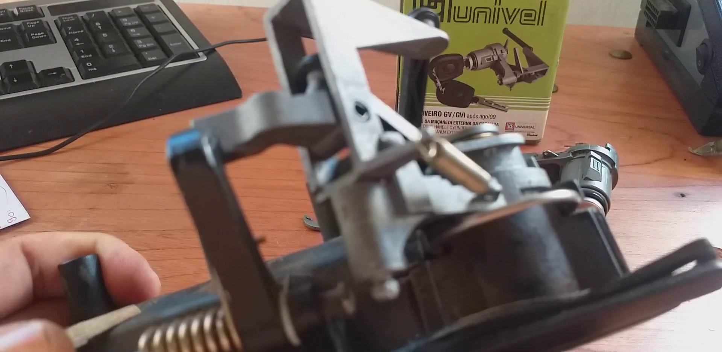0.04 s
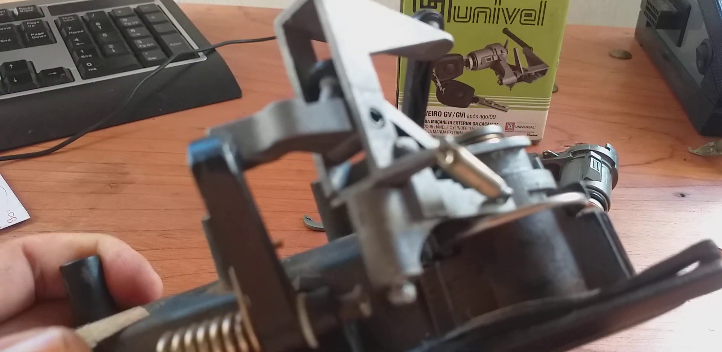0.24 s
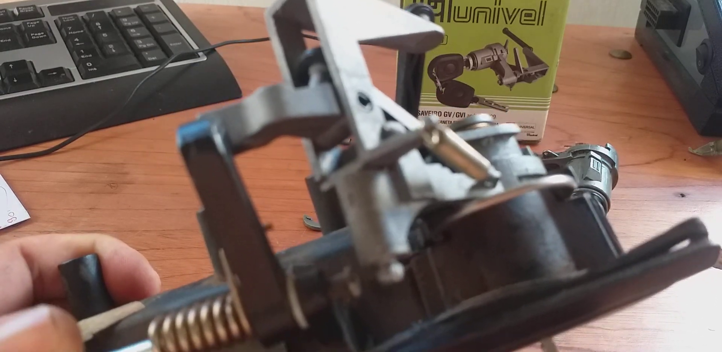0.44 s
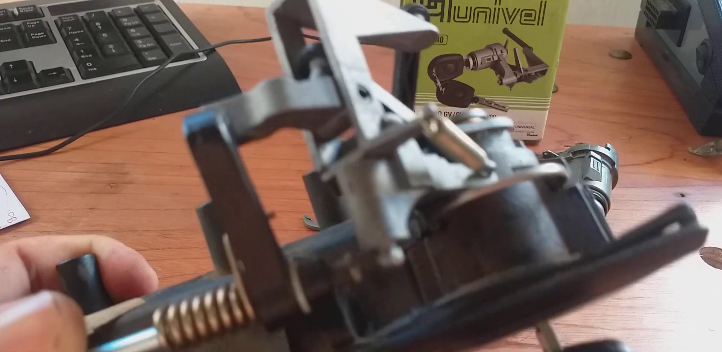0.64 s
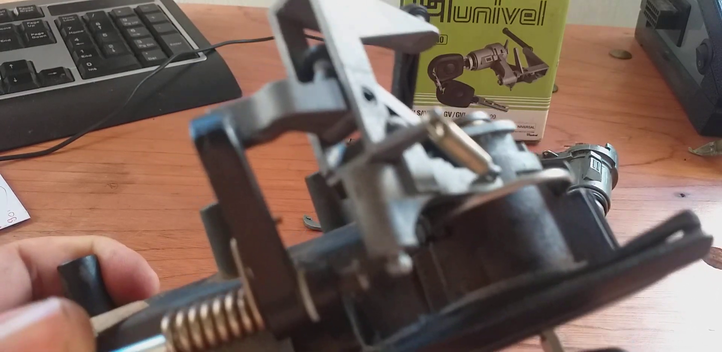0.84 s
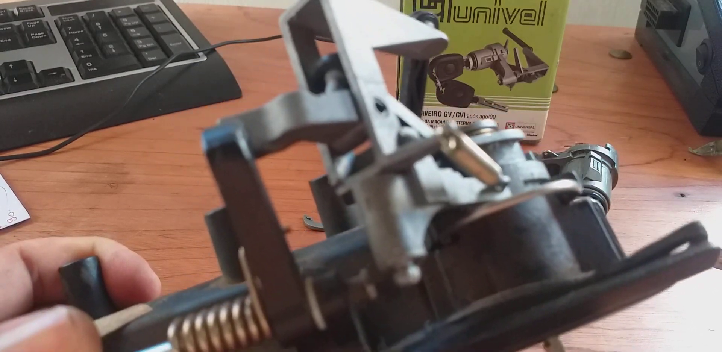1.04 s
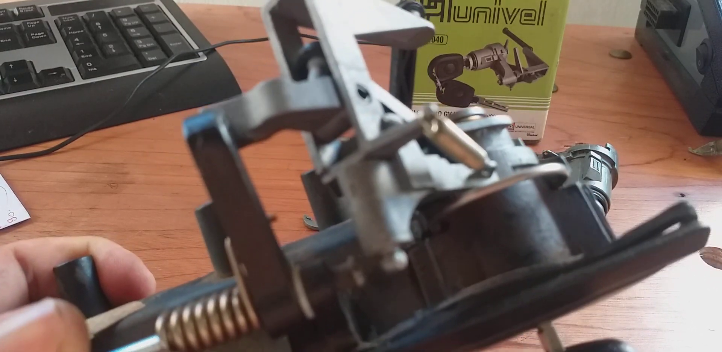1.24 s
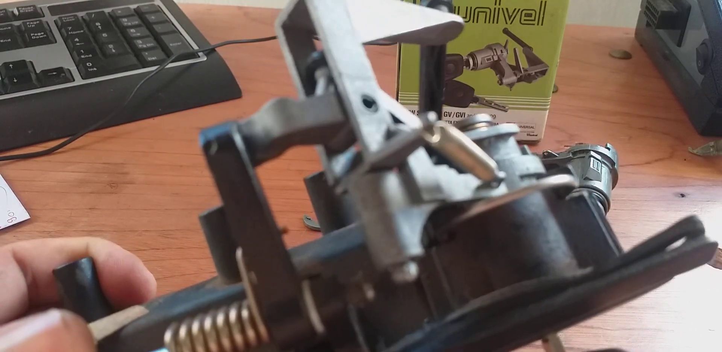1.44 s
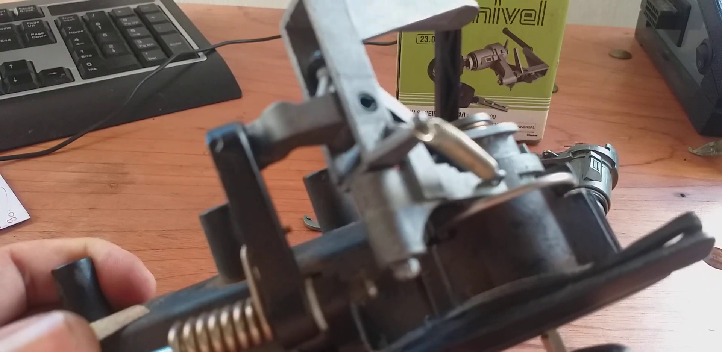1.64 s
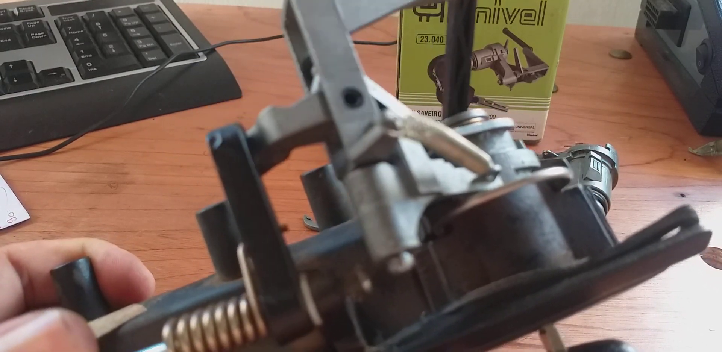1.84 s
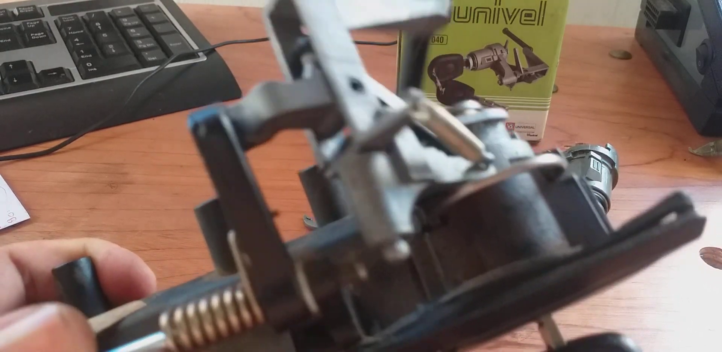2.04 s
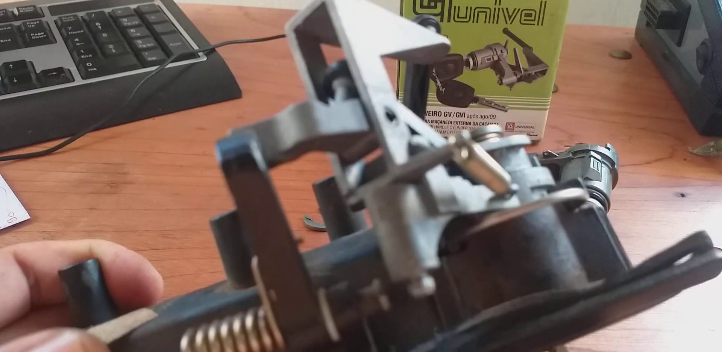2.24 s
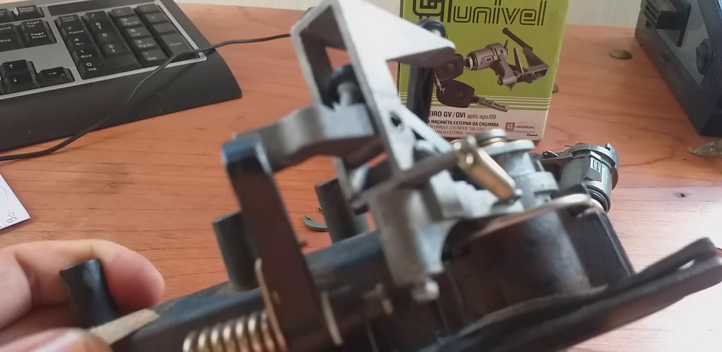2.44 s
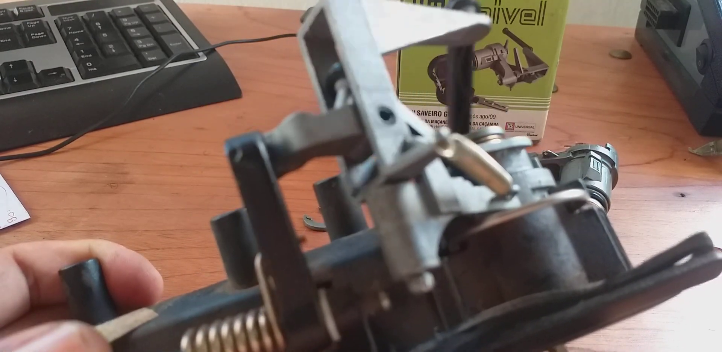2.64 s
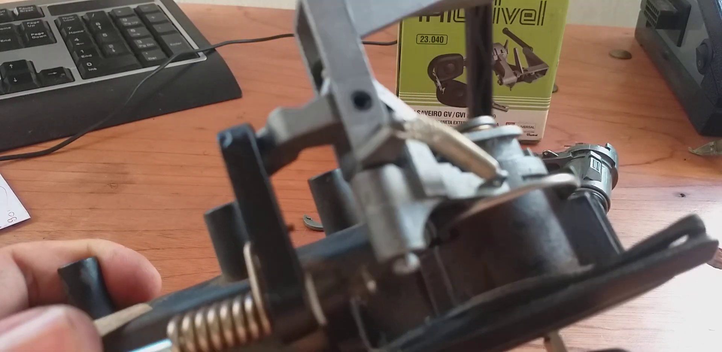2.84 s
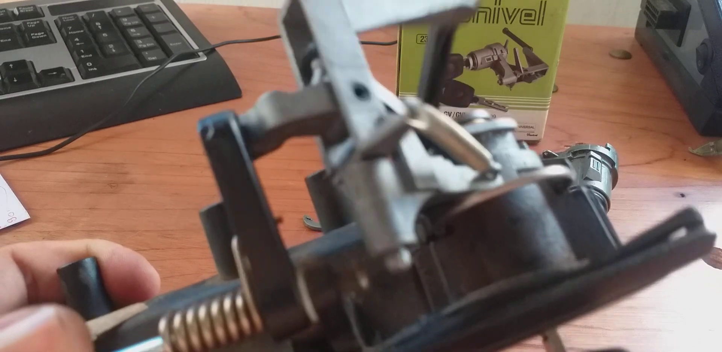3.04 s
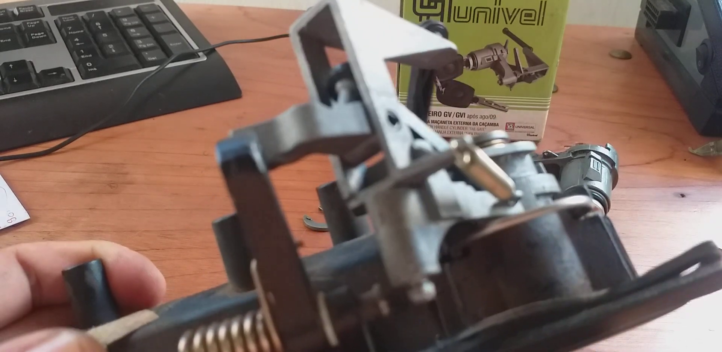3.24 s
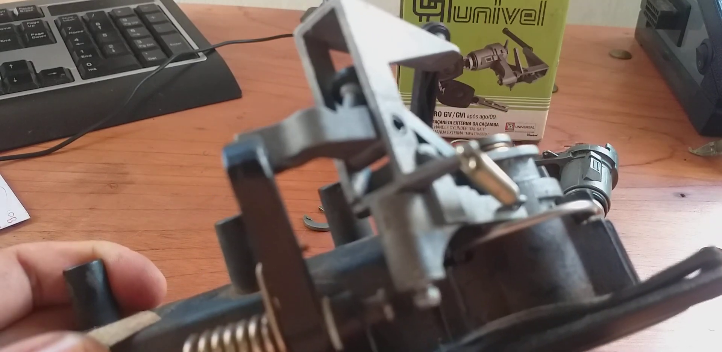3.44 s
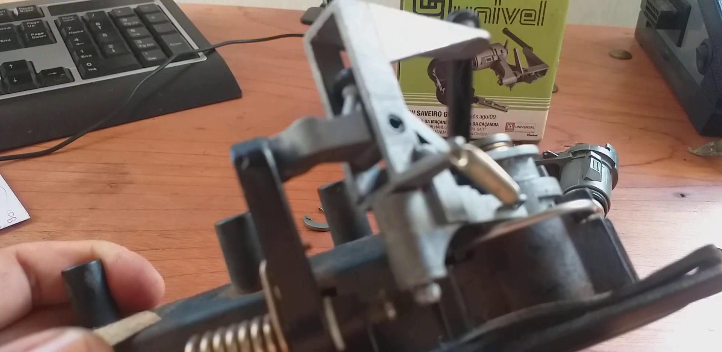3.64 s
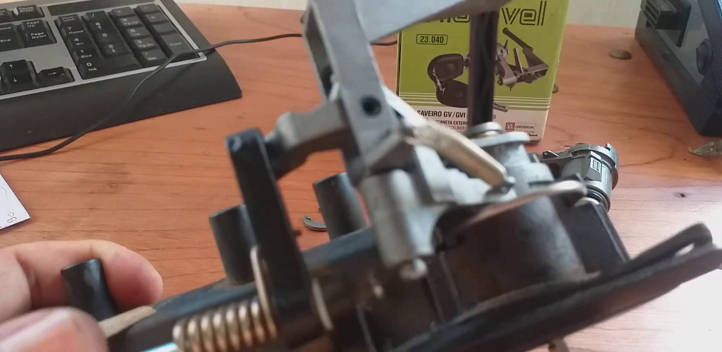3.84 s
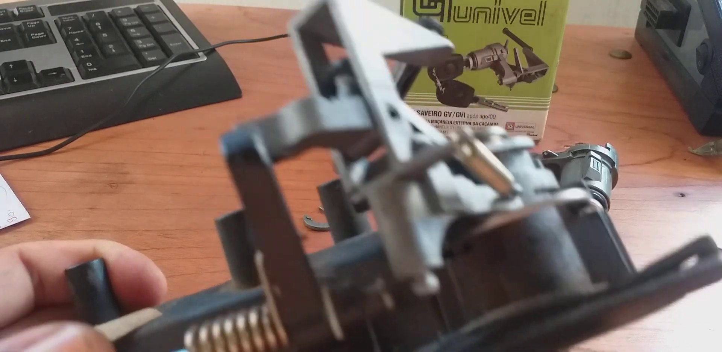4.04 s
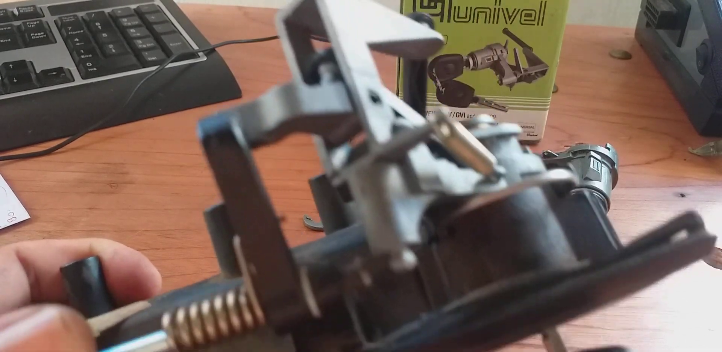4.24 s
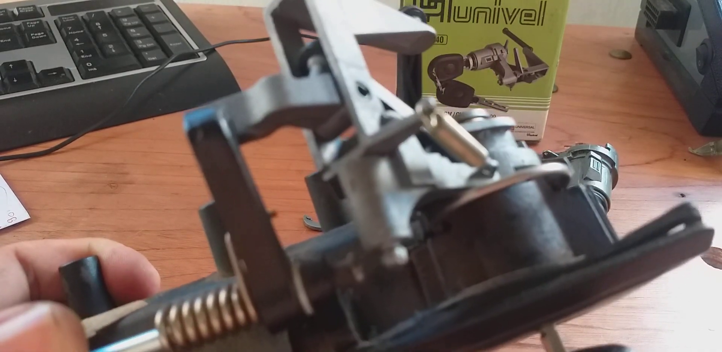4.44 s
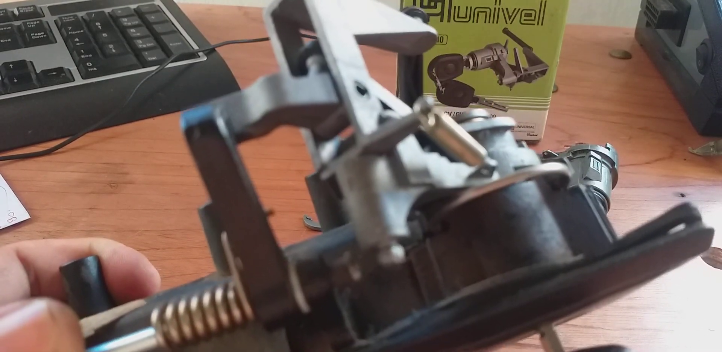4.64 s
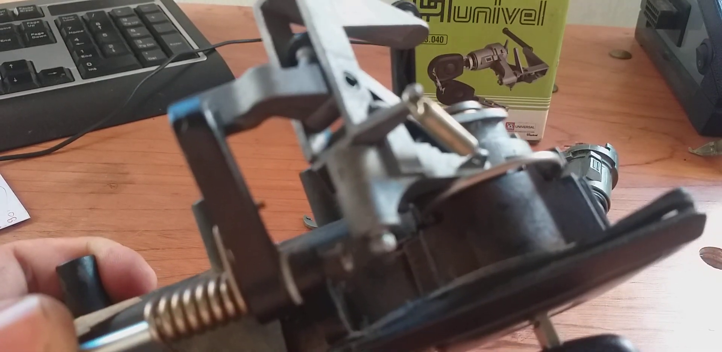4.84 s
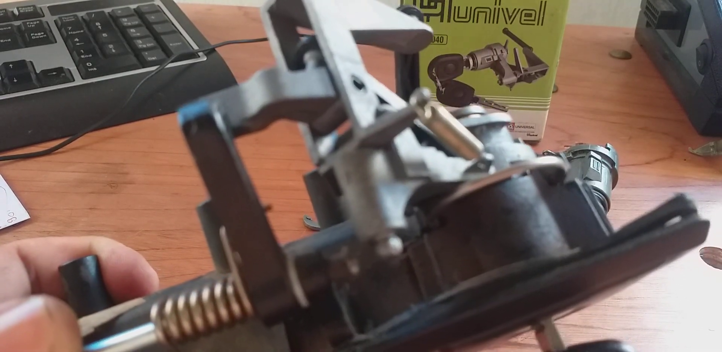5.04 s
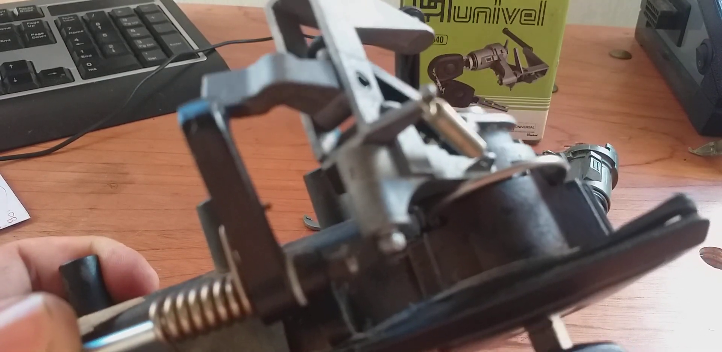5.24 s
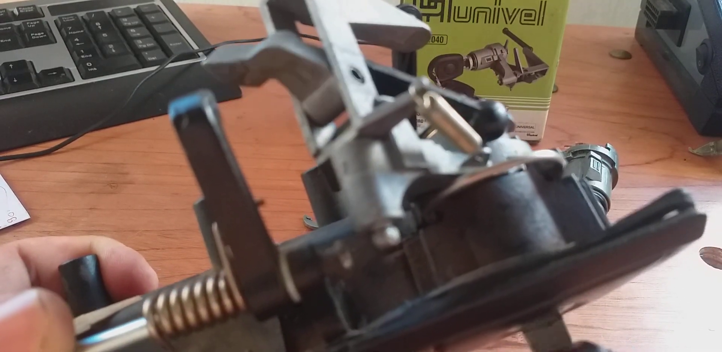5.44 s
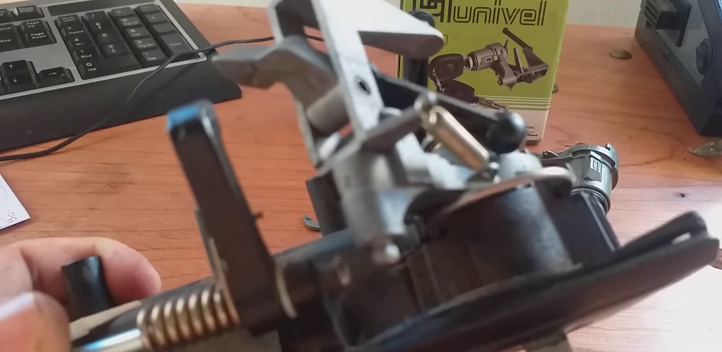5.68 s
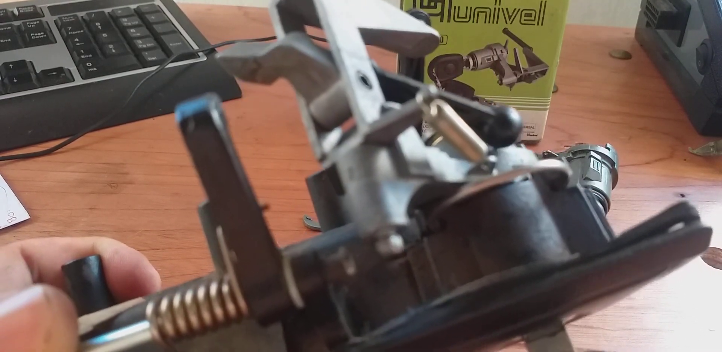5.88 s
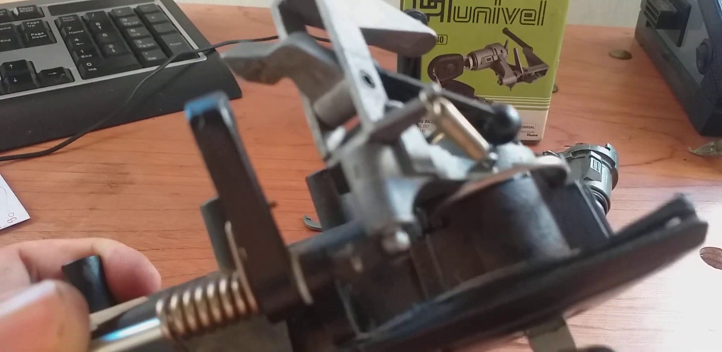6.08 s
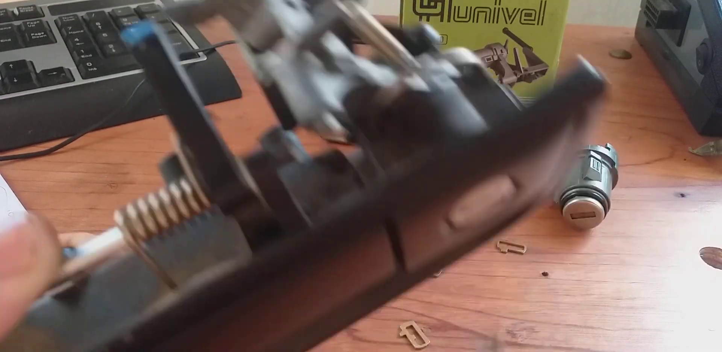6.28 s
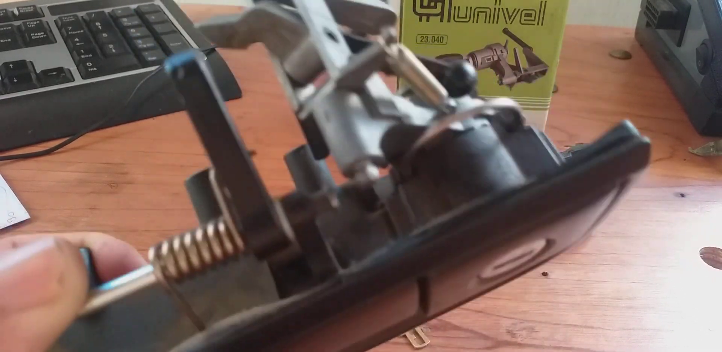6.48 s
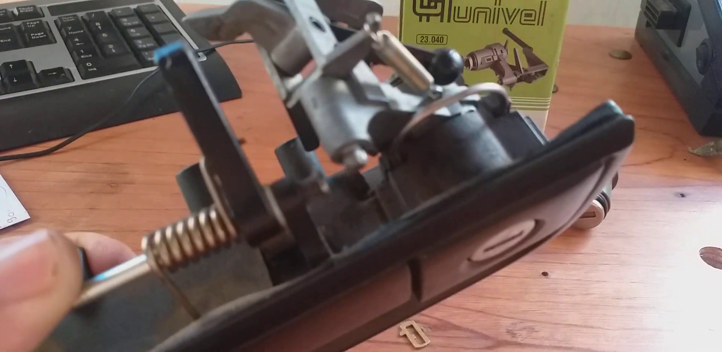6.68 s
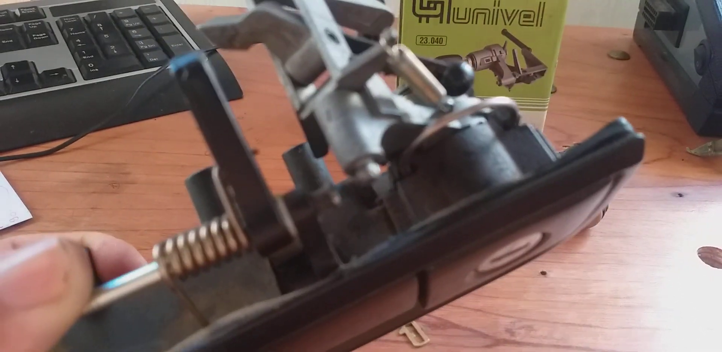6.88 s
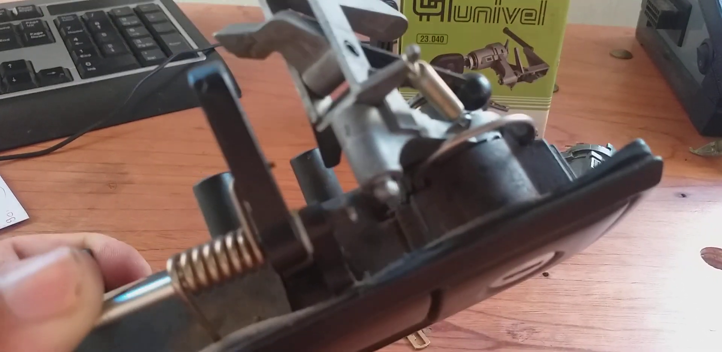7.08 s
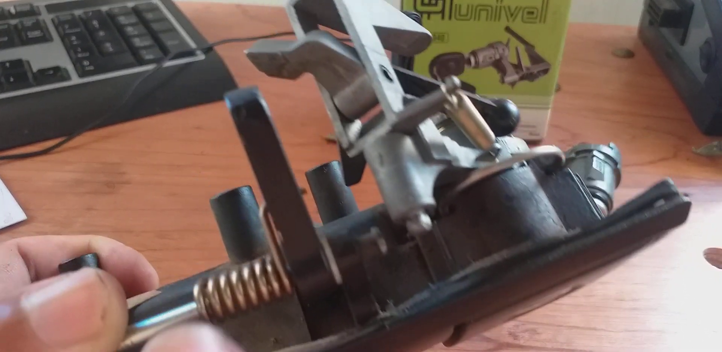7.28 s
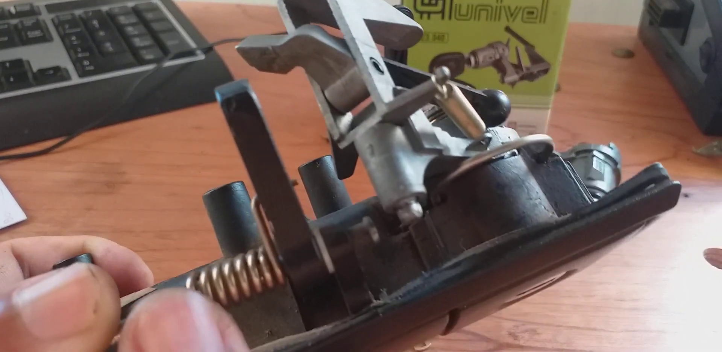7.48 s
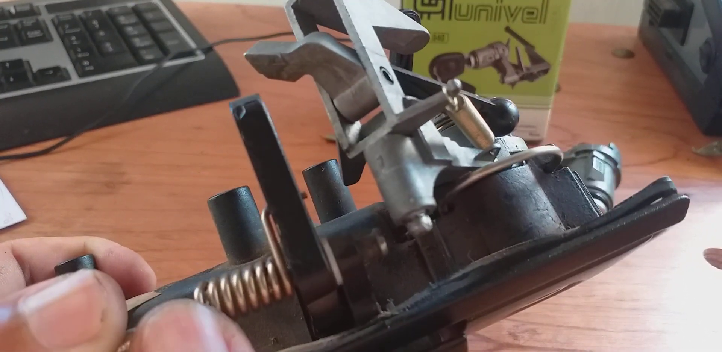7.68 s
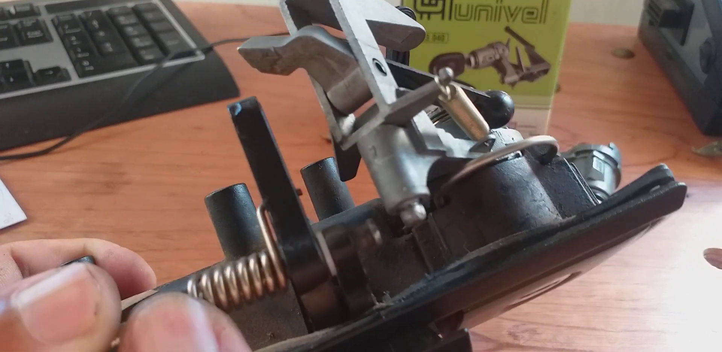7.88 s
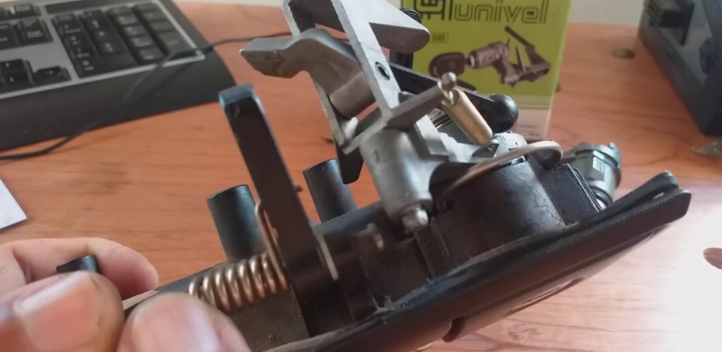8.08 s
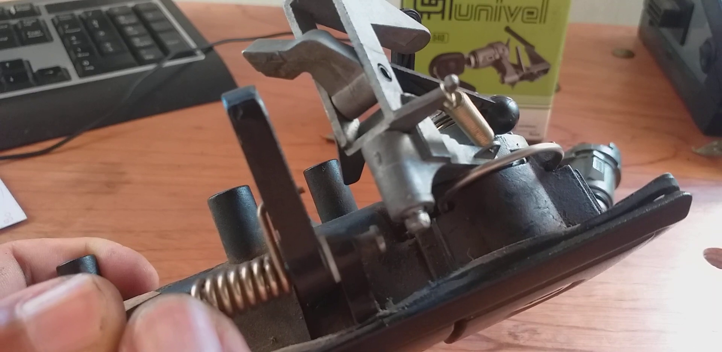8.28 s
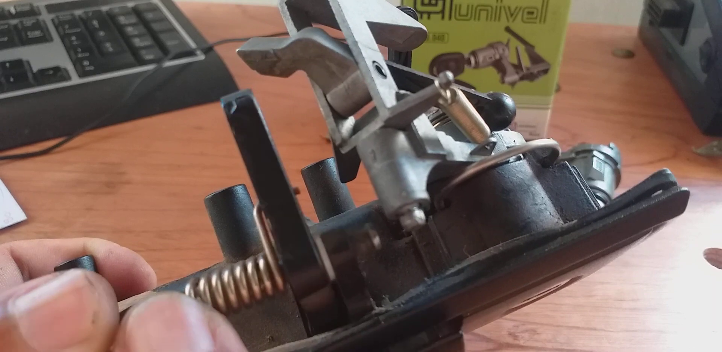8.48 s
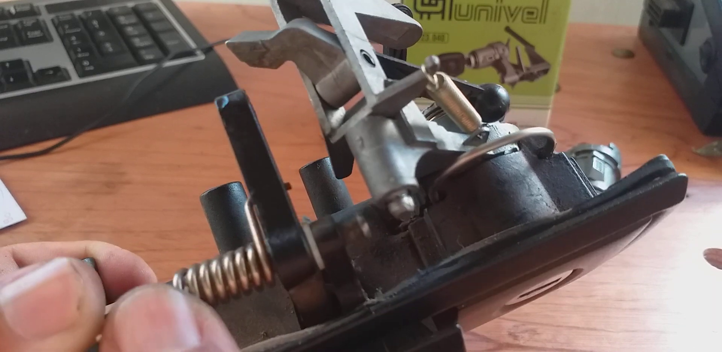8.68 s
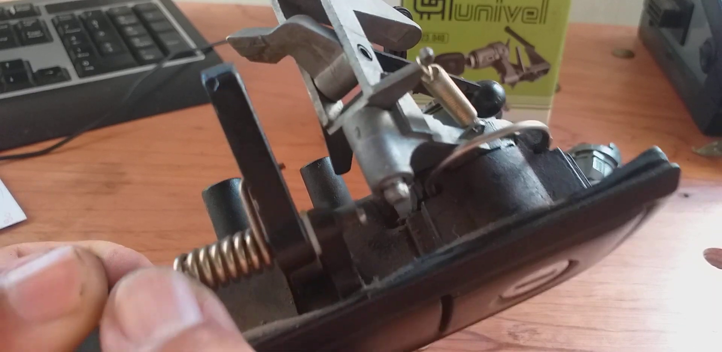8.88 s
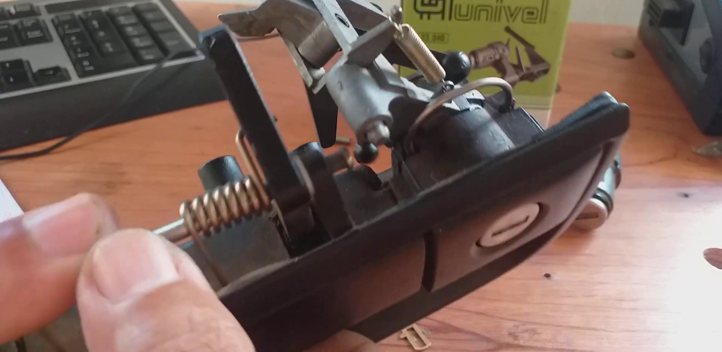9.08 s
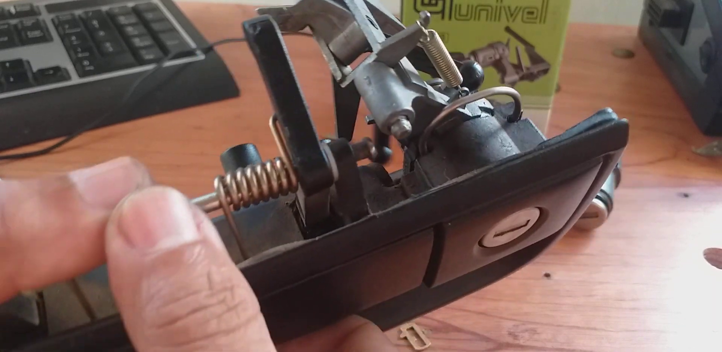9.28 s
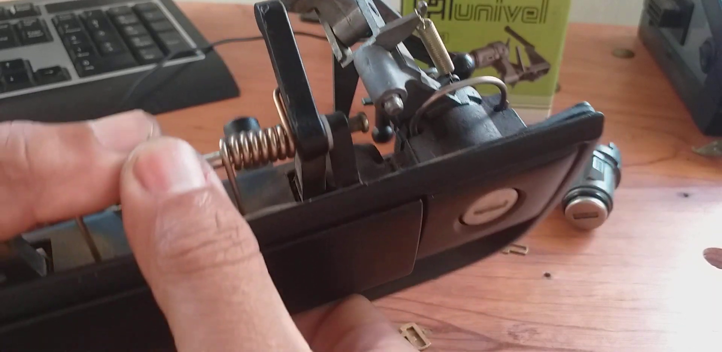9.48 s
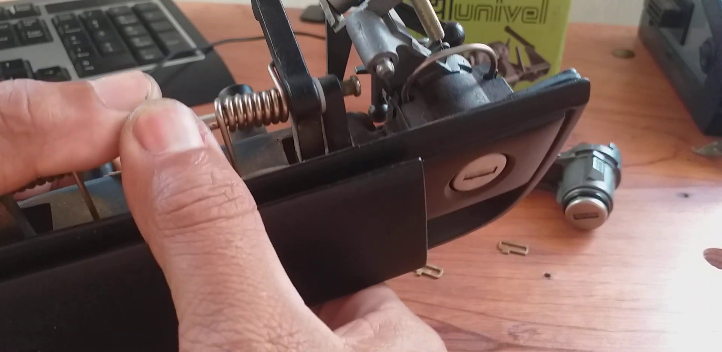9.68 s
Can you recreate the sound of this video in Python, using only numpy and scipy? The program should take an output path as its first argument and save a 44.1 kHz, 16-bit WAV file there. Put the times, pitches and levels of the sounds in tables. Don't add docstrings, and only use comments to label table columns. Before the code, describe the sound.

Close to the microphone, a small lock handle is worked by hand over a wooden desk. Irregular thin clicks and light rattles come in pairs and clusters, with soft low bumps. Past six seconds a shrill metal squeal and very loud snaps burst out, then only faint ticks remain. A low engine idles outside and fades over distant street rumble and soft hiss, in a short hard-walled room.

```python
import sys
import numpy as np
from scipy import signal
from scipy.fft import rfft, irfft, next_fast_len
from scipy.io import wavfile
from scipy.ndimage import map_coordinates

SR = 44100
rng = np.random.default_rng(int(sys.argv[2]) if len(sys.argv) > 2 else 0)


def to_linear_factor(level_db):
    exponent = np.asarray(level_db, float) / 20
    return 10 ** exponent


def file_out(sig):
    cols = np.atleast_2d(sig).T
    lim = np.clip(cols, -1, 1)
    pcm = np.round(lim * 32767).astype(np.int16)
    wavfile.write(sys.argv[1], SR, pcm)


N = 428652

# t/s, level/dB
RUMBLE_LEVEL = [(0, -72), (3, -72), (6.5, -71), (7.3, -72), (8.6, -70.5), (9.3, -72), (9.72, -75.5)]
# f/Hz, level/dB
STREET_COLOUR = [(25, -22), (45, -11.5), (70, -3), (130, -6), (200, -5), (330, -14), (450, -20), (600, -21),
                 (1200, -38.5), (3000, -61)]
# f/Hz, level/dB
HISS_COLOUR = [(410, -27), (700, -2.5), (767, -1.5), (1040, -1.5), (1140, -2), (2080, -4.5), (4050, -4),
               (8760, -10), (15000, -5), (16000, -6)]
RUMBLE_LUMPS_DB, RUMBLE_SWING_DB = 2.4, 1.5
HISS_DB, DUCK_DB, DUCK_S, DUCK_WIDTH_S = -75.5, 3.5, 7.7, .4

# t/s, firing rate f/Hz, level/dB, brightness of the upper orders level/dB
ENGINE_COURSE = [(0, 28.47, -63, -3), (.3, 28.43, -62.5, 7.5), (1, 28.5, -61, 1), (1.5, 28.68, -64, 2.5),
                 (2.2, 28.65, -62.5, -1), (2.7, 28.05, -64, 0.5), (3.4, 26.75, -66, -5),
                 (4.2, 27.06, -71.5, 2), (5, 26.48, -68.5, -7.5), (6, 27.2, -67.5, -1),
                 (6.6, 26.58, -71.5, -0.5), (7.05, 26.96, -79, 3.5), (7.28, 27.18, -84.5, -5),
                 (9.2, 27.19, -77.5, -6), (9.72, 27.2, -85, -6)]
# order of the firing rate, level/dB
EXHAUST_ORDERS = [(3, -10.5), (4, -6.5), (5, 2.5), (6, 2.5), (7, -11.5), (8, -17), (9, -11), (10, -9),
                  (11, -11), (12, -12), (13, -15), (14, -14)]
# f/Hz, level/dB
ROAR_COLOUR = [(40, -40), (80, -8.5), (150, -2.5), (330, -5), (430, -8), (600, -25), (1500, -50)]
ORDER_WAVER = 1.2
ORDER_SWING_DB, ROAR_SWING_DB = 2.4, 2.2

# f/Hz, t60/s
WALL_T60 = [(80, .3), (200, 0.85), (800, 0.29), (2100, 0.33), (5500, 0.31), (14600, 0.31)]

# t/s, peak level/dB, f/Hz
DESK_BUMPS = [(0.58, -40.5, 169), (0.889, -47.5, 113), (1.33, -42, 164), (2.59, -38.5, 178),
              (3.11, -45.5, 188.6), (3.602, -39.5, 163), (3.83, -47, 186), (4.032, -40.5, 125),
              (5.118, -45.5, 127), (5.218, -47, 152), (5.519, -47.5, 124), (5.855, -46, 135),
              (6.045, -46.5, 130), (6.434, -39.5, 118.6), (6.8165, -34, 165), (6.619, -47, 210),
              (6.664, -45, 190), (6.842, -38, 155), (7.857, -54.5, 127.2), (8.088, -36.5, 175),
              (8.095, -49, 331), (8.088, -40, 80), (8.94, -54, 105.1), (9.277, -51, 125), (9.285, -57, 58),
              (8.83, -58, 160)]
DESK_T60_S = 0.1

# t/s, length/s, f/Hz, width/Hz, level/dB
SLIDE_STROKES = [(0.486, 0.022, 5140, 400, -69), (0.523, 0.14, 5200, 6000, -67),
                 (0.736, .29, 4660, 1310, -79), (0.78, .21, 7050, 1600, -80), (1.387, .16, 730, 500, -72),
                 (1.755, 0.031, 2660, 320, -69.5), (1.758, 0.038, 1290, 260, -69),
                 (4.641, .08, 4900, 1220, -78), (4.72, 0.16, 2800, 150, -84), (4.72, 0.18, 3270, 150, -83),
                 (4.76, .17, 3770, 120, -85), (4.65, .17, 6300, 3000, -78), (4.7, .25, 3300, 2000, -85),
                 (4.44, .2, 700, 600, -80), (6.668, .075, 3130, 1900, -43), (6.303, .014, 12100, 350, -30),
                 (6.285, .05, 13550, 500, -38), (6.29, .12, 5800, 2500, -54), (8.09, .075, 3800, 2500, -80),
                 (6.582, .075, 3300, 3000, -53), (.655, .1, 2200, 1500, -66), (.56, .3, 900, 900, -74),
                 (6.745, .06, 3000, 2600, -57), (8.095, .065, 1110, 160, -74),
                 (5.361, 0.16, 5030, 4050, -73.5), (5.8, 0.12, 4700, 3005, -65),
                 (6.146, 0.085, 11800, 301, -51.5), (6.179, .099, 12620, 1540, -44.5),
                 (6.208, 0.028, 5470, 4020, -43.5), (6.226, .012, 11840, 900, -32),
                 (6.254, 0.047, 13570, 602.6, -37), (6.263, .011, 12570, 1518, -28),
                 (7.087, .011, 11280, 1200, -49), (7.068, .03, 11230, 900, -64),
                 (7.2, 0.19, 4280, 1800, -80.5), (7.279, .12, 1754, 700, -80), (9.06, .2, 557, 60, -85),
                 (8.129, 0.013, 2090, 600, -76)]
# t/s, length/s, level/dB
CAM_RIDES = [
    (2.068, .035, -78),
    (2.107, .086, -81),
    (2.456, .23, -80),
    (3.077, .045, -74),
    (4.012, .03, -72),
]
RIDE_HZ, RIDE_WIDTH_HZ = 7540, 280

# t/s, rise/s, fall/s,
# f/Hz, peak level/dB
SQUEALS_AND_PINGS = [(6.2372, .0046, .001, 13050, -.2), (6.2419, .002, .0017, 13400, -6),
                     (6.2453, .0033, .0062, 13630, -3.5), (6.2712, .0022, .0062, 12170, -.2),
                     (6.2752, .002, .0012, 13550, -10), (6.2785, .0035, .001, 12250, -6.5),
                     (.2171, .0005, .0025, 15700, -29), (6.2808, .0012, .002, 5200, -16.5),
                     (6.2808, .0012, .002, 8000, -17), (6.2805, .0015, .003, 2300, -27),
                     (6.2535, .002, .003, 13500, -17), (8.085, .003, .009, 1100, -47),
                     (8.085, .003, .008, 1780, -60), (8.086, .003, .008, 2750, -65),
                     (3.1148, .002, .006, 2690, -40), (2.103, .004, .008, 2690, -48),
                     (3.604, .003, .012, 1060, -50), (6.2338, .003, .002, 12400, -20),
                     (6.1487, .001, .005, 11900, -34), (6.1487, .001, .003, 5000, -38),
                     (6.2808, .001, .0015, 6100, -17), (6.2806, .001, .0015, 9900, -17),
                     (6.2808, .001, .002, 3900, -27), (5.2149, .002, .008, 3650, -51),
                     (5.232, .004, .014, 3600, -53), (5.216, .003, .025, 2400, -60),
                     (4.0365, .001, .009, 2500, -38)]
PING_SHADE_DB = -6

# f/Hz, width/Hz, level/dB
HOUSING_MODES = (260, 2000), [(332.2, 42, -6), (471.5, 89, -4.5), (655, 390, -5.5), (960, 300, -0.5),
                 (1260, 390, -1.5), (1530, 270, -3)]
ARM_MODES = (810, 4100), [(1760, 290, -3), (2470, 430, -0.9), (2933, 370, 1.3), (3660, 740, -1.6)]
LEVER_MODES = (3000, 7700), [(4187, 770, -2), (4980, 810, 1.5), (5600, 540, 1), (6600, 900, -5),
               (7650, 500, -0.5), (8505, 650, -5.5)]
PIN_MODES = (8500, 16600), [(9300, 1200, -10), (10400, 900, -5), (11600, 700, 0), (13000, 1600, -3),
             (14500, 1800, -4), (15700, 1200, -4)]
GRIPPED_MODES = (280, 2000), [(480, 230, -9), (995, 90, -1), (1135, 200, -8.5), (1456, 400, -15)]
LOADED_ARM_MODES = (1550, 4500), [(2010, 230, -5.5), (2374, 110, -3), (2724, 120, -0.5), (3020, 150, -2.5),
                    (3610, 170, -2.5)]
LOADED_LEVER_MODES = (3400, 9600), [(4010, 150, -4.5), (4410, 330, -8.5), (4990, 131.5, -0.5),
                      (5673, 190, -6.5), (6223, 140, -2.5), (6810, 129.8, -4.5), (7590, 150, -3),
                      (8250, 400, -13)]

# t/s, strength level/dB,
# place along the linkage (0 housing, 1 arm, 2 lever, 3 pin), loss one part away level/dB
HEEL_HITS = [(1.3009, -42.5, 0.87, 6), (1.3398, -52.5, 1.7, 1.5), (1.7594, -57, 0.8, 14),
             (1.8677, -52, 0.6, 7), (2.5613, -55.5, 1.19, 5), (2.5893, -50.5, 1.8, 2.5),
             (3.5682, -49.5, 1.3, 8.5), (3.5906, -56, -0.011, 8), (5.5523, -51.5, 0.79, 11),
             (5.8531, -50, 1.2, 3.5), (8.0871, -58.5, -0.25, 1.5), (9.2776, -70, -0.3, 5)]
MORE_HEEL_HITS = [
    (6.8425, -20.5, 0.4, 5),
    (3.92, -64, 0.46, 4.5),
    (4.785, -63.5, 0, 10),
    (3.7, -67, 1, 11),
    (6.846, -30, 0.7, 6),
    (6.2812, -44.5, .1, 8),
]
ELBOW_HITS = [(0.283, -49.5, 1.3, 6.1), (0.6084, -57.5, 1.1, 2.4), (0.6455, -56, 1.1, 6),
              (1.2896, -47, 1.1, 6.6), (3.1259, -46, 0.73, 5.4), (6.6632, -23, 1.4, 9),
              (6.6738, -33, 1.35, 8), (4.429, -66, 1.9, 3.4), (6.8253, -16.5, 1.5, 5.5),
              (6.899, -37, 1.1, 7.8), (6.6705, -36, 1.1, 7), (6.6648, -28, 1.3, 9), (6.8266, -19, 1.6, 7),
              (6.6885, -40, 1.1, 8), (7.5268, -63, 1.34, 9.4)]
CRANK_HITS = [(1.2852, -48.5, 1.32, 5.8), (2.4957, -44, 1.16, 7.7), (2.838, -52, 1.03, 8.1),
              (3.8191, -55, 1.74, 6.7), (3.8289, -42, 1.4, 5.2), (5.2149, -45, 0.9, 8),
              (5.2372, -55, 1.2, 8.4), (5.8029, -56, 1.1, 7.2), (5.8999, -56.5, 1.6, 6.6),
              (6.0329, -64, 1.3, 12), (6.6179, -32, 0.7, 4.5), (6.6215, -37, .5, 5),
              (3.5408, -43.5, 1.4, 8), (5.793, -65, 1.5, 12), (6.8181, -24.5, 0.91, 4),
              (6.8692, -42.5, 1.44, 4.8), (9.6879, -70.5, 1.37, 3.6)]
ROD_HITS = [
    (0.5405, -54, 1.9, 5),
    (0.5822, -45.5, 1.04, 6.9),
    (4.1395, -61.0, 2, 8.8),
    (5.9052, -52, 1.92, 11),
    (6.7388, -40.5, 1.7, 5.3),
    (6.9728, -57, 2.1, 7.1),
    (7.0851, -49, 1.25, 5.8),
]
CAM_HITS = [(0.2708, -45.5, 1.0, 3.5), (0.4993, -63, 2, 6.0), (0.5076, -41.5, 1.5, 10.6),
            (0.5126, -35.5, 1.85, 8), (0.6493, -33.5, 1.42, 17.4), (0.6974, -53.5, 4.5, 4.6),
            (1.3069, -50.5, 2.5, 4.9), (2.1178, -44.5, -2, 2.8), (2.1587, -53.5, 1.5, 3.5),
            (2.1678, -49, 1.7, 7.8), (2.237, -66, 1.6, 10), (2.5821, -57, 1.0, 4), (4.055, -44, 2.5, 7.1),
            (4.065, -52, 0, 8.2), (4.0669, -43, 2, 8.1), (4.2073, -67, 2, 18.3), (5.8264, -59.5, 0.7, 4.9),
            (5.858, -53.5, 1.46, 6), (6.046, -57.5, 0.84, 5.2), (6.2089, -50, 1.5, 4.39),
            (6.2646, -43, 1.6, 10), (6.2805, -14, 3.5, 9), (6.5166, -60, 2, 13),
            (6.5787, -32.5, 1.38, 11.3), (6.6062, -34, 1.7, 10), (6.6085, -38, 1.8, 12),
            (6.5815, -38, 1.4, 10), (6.8877, -27, 1.6, 12), (7.877, -66.5, 1.6, 6.8)]
MORE_CAM_HITS = [(3.62, -52.5, 1.7, 12), (4.2073, -50.5, 2.05, 24), (5.377, -67, 1.5, 2.5),
                 (2.247, -64.5, 2.1, 14), (5.117, -69, 2, 16), (5.143, -71, 1.8, 6), (6.7465, -54, 1.5, 1.5),
                 (3.272, -65, 2, 10), (.437, -72, 1.5, 8), (7.0845, -47, 1.65, 10), (6.021, -66.5, 1.7, 10),
                 (2.7, -79, 2, 3), (4.163, -59, 2, 12), (1.363, -60, 1.8, 5), (6.2815, -24.5, 2.1, 10),
                 (8.028, -73, 2.2, 5), (4.655, -68, 2, 8), (4.682, -69, 2.1, 6), (6.8545, -29, 1.3, 6)]
PAWL_HITS = [
    (5.4047, -62, 1.2, 9.8),
    (5.4132, -52.5, 2.3, 4.4),
    (5.5024, -54, 1.2, 8.9),
    (6.2146, -43.5, 2.3, 4.6),
    (6.2241, -33, 3.05, 5.0),
    (7.8307, -56.5, 1.4, 5.06),
    (9.4751, -67, 1.7, 7.6),
]
STOP_HITS = [(0.572, -53.5, 3.4, 0.8), (0.777, -60.5, 2.1, 9), (1.325, -55, 1.3, 4),
             (2.1016, -54, 0.7, 5.3), (2.1058, -42.5, 1.73, 7.2), (3.1159, -35.5, 1.65, 3.6),
             (3.6078, -48.5, 1.72, 1.7), (4.0365, -33.5, 1.54, 3.8), (4.453, -64, 2, 7.2),
             (5.5089, -57, 1.99, 3.48), (5.5157, -40.5, 2.0, 5), (5.812, -58, 2.0, 13),
             (6.2314, -36, 2.13, 8), (6.2688, -31, 2.1, 9), (6.8368, -23.5, 1.5, 5), (6.8524, -20, 1.4, 6),
             (7.0362, -57, 2, 3)]
TIP_HITS = [(0.2171, -41.5, 2.2, 11), (4.772, -64.5, 1.1, 7), (6.149, -32, 2.58, 12),
            (6.1942, -31.5, 2.92, 7), (7.0365, -58, 3.2, 12), (7.187, -61.5, 2.9, 14),
            (7.191, -64, 2.9, 14.2), (7.279, -69, 2.4, 3), (7.292, -66, 2.6, 3), (7.0791, -46, 2.3, 2.9),
            (7.0917, -42.5, 1.34, 3.6)]
# contacts, its own ring f/Hz, the part it sits on
STRUCK_SPOTS = [([*HEEL_HITS, *MORE_HEEL_HITS], 1100, "housing"), (ELBOW_HITS, 2600, "arm"),
                (CRANK_HITS, 3550, "arm"), (ROD_HITS, 4400, "lever"), ([*CAM_HITS, *MORE_CAM_HITS], 5030, "lever"),
                (PAWL_HITS, 6050, "lever"), (STOP_HITS, 7560, "lever"), (TIP_HITS, 11750, "pin")]
RADIATES_DB = {"housing": 2.5, "arm": -0.55, "lever": 2.5, "pin": -0.4}
RATTLE_T60_S = {"held": .031, "free": .017}
LET_GO_S = (6.1, 7.2)
LOADED_S = (1.6, 5.3)
SPREAD_POWER = 1.6
SPREAD_DB = 6
SPOT_SCATTER = .012
FREE_SPOT_DB = 4
SHARP = 3.2

TOP_HZ, LEAK_DB = 15850, -19


def unit(x):
    return x / np.sqrt(np.mean(x ** 2) + 1e-20)


def along(points, hz):
    f, v = np.transpose(points)
    return np.interp(np.log(hz + 1), np.log(f + 1), v)


def curves(rows):
    s, *cols = np.transpose(rows)
    return [np.interp(np.arange(N) / SR, s, c) for c in cols]


def wobble(rate, size=N):
    knots = rng.standard_normal(int(size * rate / SR) + 4)
    return map_coordinates(knots, [np.arange(size) * rate / SR])


def filtered(x, response):
    m = next_fast_len(len(x) + 8192)
    return irfft(rfft(x, m) * response(np.fft.rfftfreq(m, 1 / SR)), m)[:len(x)]


def coloured_noise(colour):
    return unit(filtered(rng.standard_normal(N), lambda f: to_linear_factor(along(colour, f))))


def mode(f, hz, width):
    return 1j * f * width / (hz * hz - f * f + 1j * f * width)


def add(track, s, sound):
    part = track[max(round(s * SR), 0):][:len(sound)]
    part += sound[:len(part)]


def background():
    rumble = coloured_noise(STREET_COLOUR)
    hiss = coloured_noise(HISS_COLOUR)
    rumble_db = curves(RUMBLE_LEVEL)[0] + RUMBLE_LUMPS_DB * wobble(9.4) + RUMBLE_SWING_DB * wobble(1.5)
    dip = np.exp(-((np.arange(N) / SR - DUCK_S) / DUCK_WIDTH_S) ** 2)
    return to_linear_factor(rumble_db) * rumble + to_linear_factor(HISS_DB - DUCK_DB * dip) * hiss


def engine():
    rate, db, bright_db = curves(ENGINE_COURSE)
    turn = 2 * np.pi * np.cumsum(rate * (1 + 0.0051 * wobble(4.7))) / SR
    orders = np.zeros(N)
    for k, rel_db in EXHAUST_ORDERS:
        order_db = rel_db + bright_db * (k > 5) + ORDER_SWING_DB * np.sqrt(k / 5) * wobble(k)
        phase = 2 * np.pi * rng.random() + .6 * (k / 5) ** ORDER_WAVER * wobble(k)
        orders += to_linear_factor(order_db) * np.sin(k * turn + phase)
    roar = coloured_noise(ROAR_COLOUR)
    return to_linear_factor(db) * (orders + to_linear_factor(-4 + ROAR_SWING_DB * wobble(7.8)) * roar)


def workshop(x, count=40):
    out = np.zeros(N)
    hz, t, z = signal.stft(rng.standard_normal((count, SR // 2)), SR, nperseg=256)
    decay = to_linear_factor(-60 * t / along(WALL_T60, hz)[:, None])
    tails = signal.istft(z * decay, SR, nperseg=256)[1]
    tails *= np.clip(np.arange(tails.shape[1]) / SR / 0.0069, 0, 1)
    step = N // count + 1
    for k, tail in enumerate(tails):
        wet = signal.fftconvolve(x[k * step:][:step], tail / np.linalg.norm(tail))
        add(out, k * step / SR + 0.0025, wet)
    return out


def bumps():
    out, t = np.zeros(N), np.arange(SR // 2) / SR
    soft = (1 - np.exp(-t / .0022)) ** 2
    for s, db, hz in DESK_BUMPS:
        boom = np.zeros(len(t))
        for ratio, rel_db in [(1.04, 1.5), (0.9, -4.5), (1.6, -5.5)]:
            boom += to_linear_factor(rel_db) * np.sin(2 * np.pi * hz * ratio * t)
        add(out, s, to_linear_factor(db - 1.5 - 60 * t / DESK_T60_S) * soft * boom)
    return out


def slides():
    out = np.zeros(N)
    rides = [(s, length, RIDE_HZ, RIDE_WIDTH_HZ, db) for s, length, db in CAM_RIDES]
    for s, length, hz, width, db in [*SLIDE_STROKES, *rides]:
        size = round(length * SR)
        grit = rng.standard_normal(size) * to_linear_factor(3 * wobble(250, size=size))
        scrape = unit(filtered(grit, lambda f: mode(f, hz, width) ** 2))
        add(out, s, to_linear_factor(db) * signal.windows.tukey(size, .4) * scrape)
    return out


def squeals():
    out, carried = np.zeros((2, N))
    for s, rise, fall, hz, db in SQUEALS_AND_PINGS:
        t = np.arange(round((rise + fall) * SR)) / SR
        growth = np.sin(np.pi / 2 * t / rise) ** 2
        release = np.abs(np.cos(np.pi / 2 * (t - rise) / fall)) ** 1.3
        waver = 0.39 * wobble(640, size=len(t))
        tone = to_linear_factor(db) * np.where(t < rise, growth, release) * np.sin(2 * np.pi * hz * t + waver)
        add(out, s, tone)
        add(carried, s, to_linear_factor(PING_SHADE_DB * (hz < PIN_MODES[0][0])) * tone)
    return out, carried


def ring(blows, part):
    edges, modes = part
    band = signal.butter(3, edges, "bandpass", fs=SR, output="sos")

    def response(f):
        return sum((-1) ** k * to_linear_factor(db) * mode(f, hz, w) for k, (hz, w, db) in enumerate(modes))

    answer = signal.sosfilt(band, filtered(signal.unit_impulse(4096), response))
    return signal.oaconvolve(blows, answer / np.linalg.norm(answer))[:N]


def contacts():
    parts = [HOUSING_MODES, ARM_MODES, LEVER_MODES, PIN_MODES, GRIPPED_MODES, LOADED_ARM_MODES, LOADED_LEVER_MODES]
    toward, around = np.zeros((2, len(parts), N))
    spots, t = np.zeros(N), np.arange(1300) / SR
    hits = [(*row, hz, part) for rows, hz, part in STRUCK_SPOTS for row in rows]
    for s, strength_db, place, loss_db, hz, part in hits:
        parts_db = [strength_db + gain_db - abs(loss_db) * abs(k - place) ** SPREAD_POWER
                    for k, gain_db in enumerate(RADIATES_DB.values())]
        hz = hz * (1 + SPOT_SCATTER * rng.standard_normal())
        free = LET_GO_S[0] < s < LET_GO_S[1]
        loaded = LOADED_S[0] < s < LOADED_S[1]

        rattle_t60 = RATTLE_T60_S["free" if free else "held"]
        burst = 2.5 * rng.standard_normal(len(t)) * to_linear_factor(-60 * t / rattle_t60)
        burst[0] = SHARP
        burst /= np.linalg.norm(burst[:180])

        driven = [0 if free else 4, *((5, 6) if loaded else (1, 2)), 3]
        for k, db in zip(driven, parts_db):
            add(toward[k], s - .0003, to_linear_factor(db + 16.5) * burst)
            room_db = db + 18.5 - 3 * (k == 3) - SPREAD_DB * (k > 4)
            add(around[k], s + .0013 * (k % 4), np.ones(1) * to_linear_factor(room_db))
            if k > 4:
                add(around[k - 4], s + .002, np.ones(1) * to_linear_factor(db + 17))

        struck_db = parts_db[list(RADIATES_DB).index(part)]
        rough = 1 + 0.22 * wobble(660, size=len(t))
        spot_level = to_linear_factor(struck_db + 5.0 - FREE_SPOT_DB * free - 60 * t / 0.012)
        add(spots, s - .0002, spot_level * rough * np.sin(2 * np.pi * hz * t))
    direct = sum(ring(track, part) for track, part in zip(toward, parts))
    spread = sum(ring(track, part) for track, part in zip(around, parts))
    return direct + spots, spread + to_linear_factor(-8) * spots


def scene():
    clicks, spread = contacts()
    rubs = slides()
    sung, carried = squeals()
    desk = bumps()
    room = workshop(to_linear_factor(-7.5) * spread + to_linear_factor(-11.0) * rubs + to_linear_factor(-15) * carried + to_linear_factor(-13.5) * desk)
    return (clicks + rubs + sung + desk + room + engine() + background())[None]


def band_limit(x):
    return signal.sosfilt(signal.butter(12, 16510, fs=SR, output="sos"), x)


def record(dry):
    x = signal.sosfilt(signal.butter(3, 48, "highpass", fs=SR, output="sos"), dry[0])
    x = filtered(x, lambda f: np.maximum(1 / (1 + (f / TOP_HZ) ** 300), to_linear_factor(LEAK_DB)))
    return band_limit(np.clip(x, -1, 1)[None])


dry = scene()
out = record(dry)
file_out(out)
```